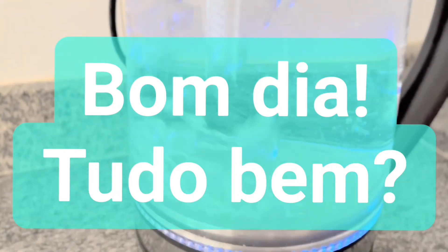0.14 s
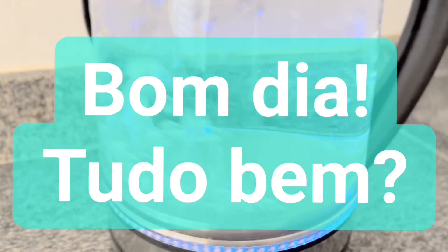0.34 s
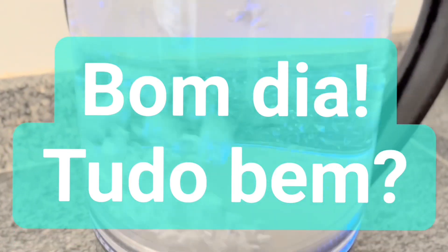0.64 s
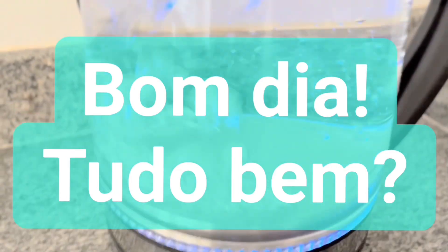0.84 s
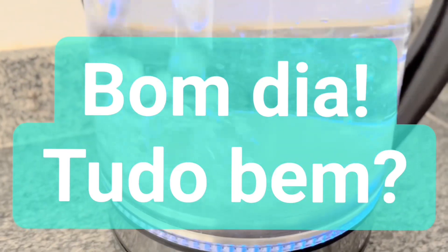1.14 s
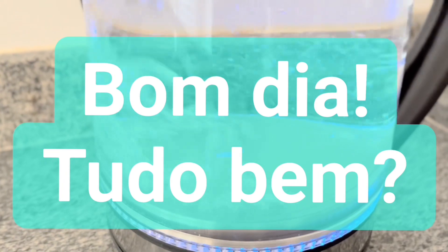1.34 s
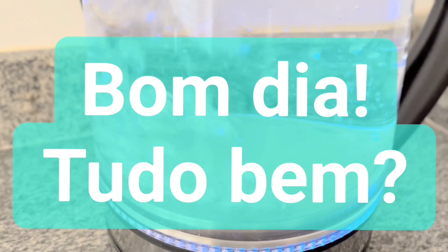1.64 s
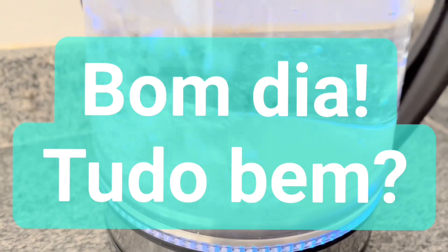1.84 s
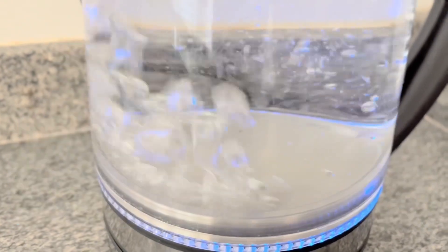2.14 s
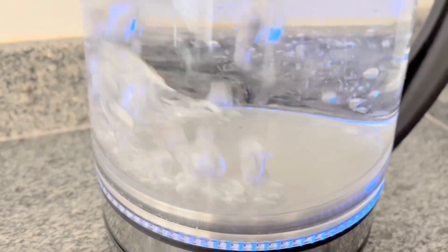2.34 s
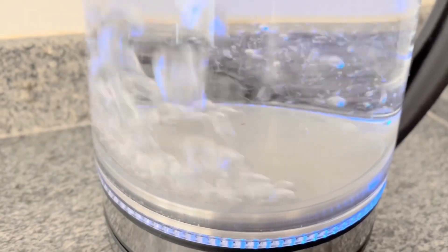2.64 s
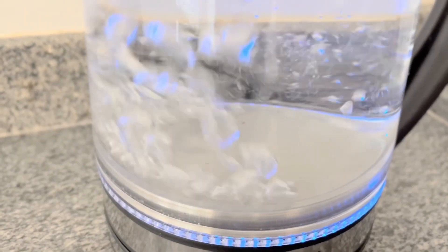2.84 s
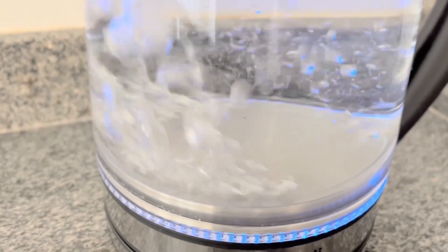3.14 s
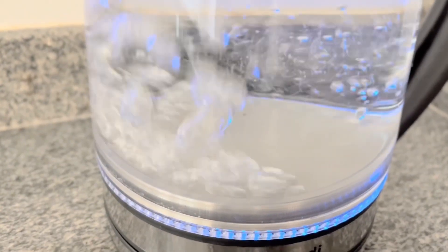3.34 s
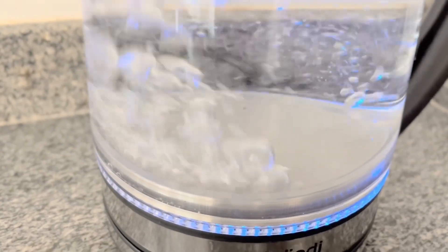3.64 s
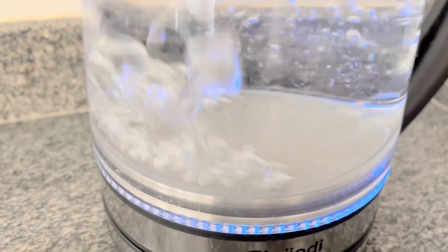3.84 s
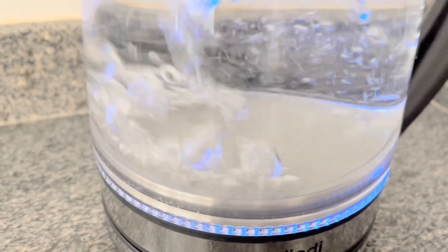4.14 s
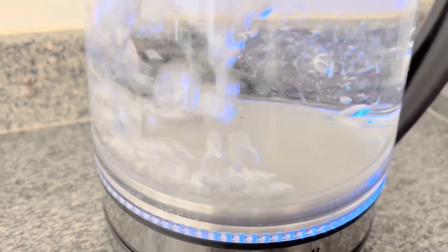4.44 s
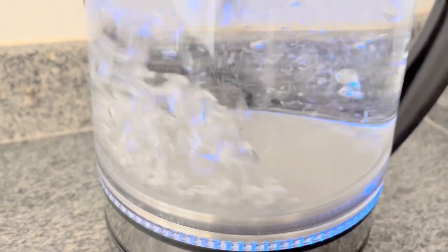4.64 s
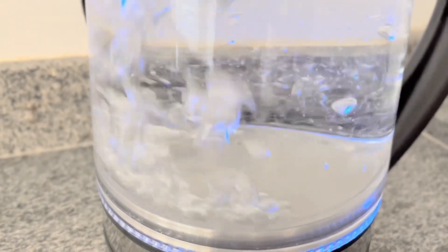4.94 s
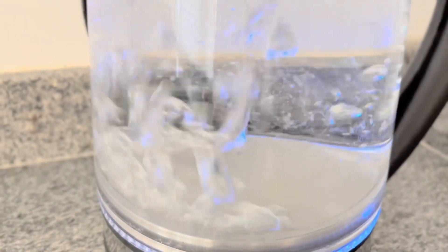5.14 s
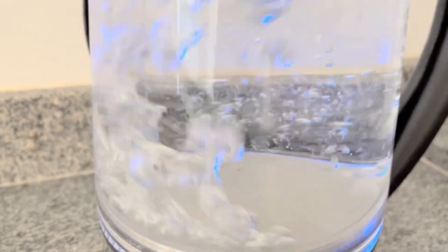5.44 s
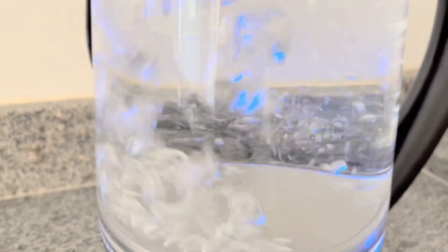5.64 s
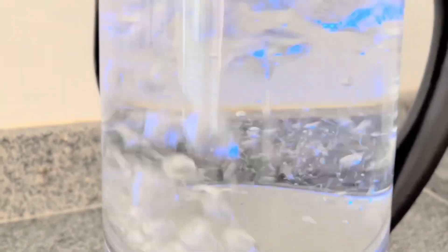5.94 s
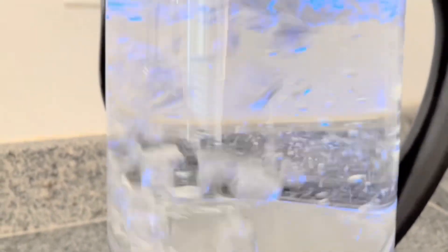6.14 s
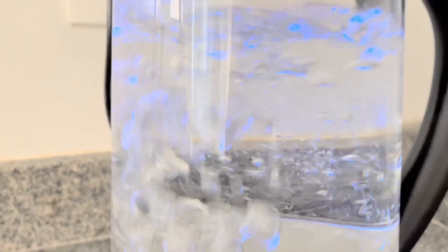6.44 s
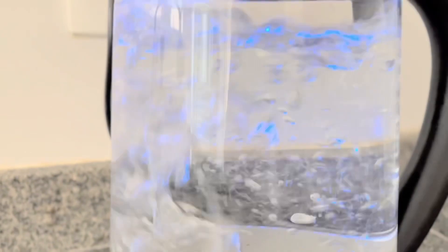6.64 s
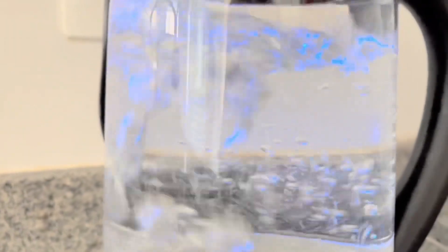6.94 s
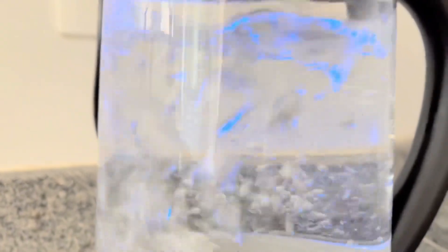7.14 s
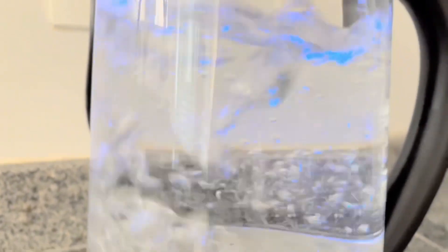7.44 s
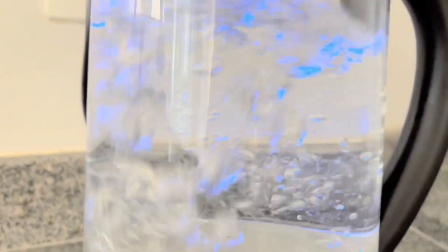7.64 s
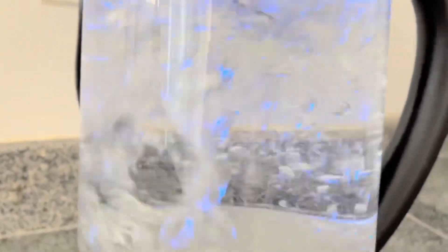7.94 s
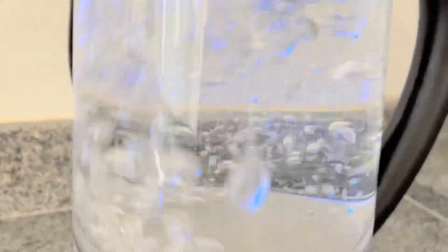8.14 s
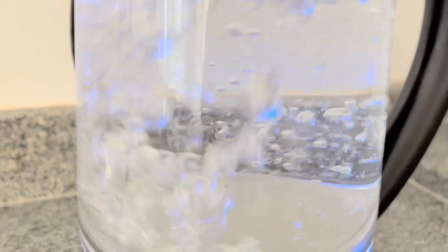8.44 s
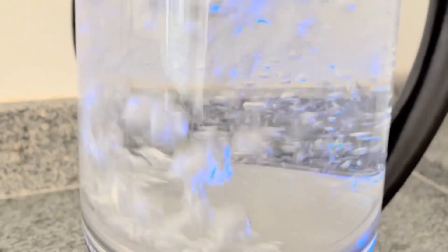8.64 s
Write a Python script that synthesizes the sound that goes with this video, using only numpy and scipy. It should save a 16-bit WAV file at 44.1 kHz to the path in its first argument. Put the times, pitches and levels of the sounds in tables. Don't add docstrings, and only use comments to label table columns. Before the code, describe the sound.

Continuous rolling boil in a glass jug, heard very near and fairly dry in a kitchen. The deep water rumble surges and dips several times a second under a dense gurgling churn. Rounded bubbles gulp and pop, little ones ping faintly on glass, and sharp spatter increases with time. A very faint electric buzz hides in the base.

```python
import sys
import numpy as np
from scipy import signal
from scipy.fft import rfft, irfft, next_fast_len
from scipy.io import wavfile
from scipy.ndimage import uniform_filter1d

SR = 44100
rng = np.random.default_rng(int(sys.argv[2]) if len(sys.argv) > 2 else 0)


def inscribe(sig):
    pcm = np.round(np.clip(np.atleast_2d(sig).T, -1, 1) * 32767)
    wavfile.write(sys.argv[1], SR, pcm.astype(np.int16))


def ratio_of_db(decibels):
    return 10 ** (np.asarray(decibels, float) / 20)


N = 387631


def rms_one(x):
    return x / np.sqrt(np.mean(x ** 2) + 1e-20)


def in_time(rows):
    s, value = np.transpose(rows)
    return np.interp(np.arange(N) / SR, s, value)


def at_hz(rows, hz, column=1):
    rows = np.array(rows)
    return np.interp(np.log(hz), np.log(rows[:, 0]), rows[:, column])


def band_pass(order, low_hz, high_hz, x):
    return signal.sosfilt(signal.butter(order, [low_hz, high_hz], "band", fs=SR, output="sos"), x)


def pan(side_db):
    return ratio_of_db(np.array([[side_db], [-side_db]]))


def add(out, s, sound):
    i = round(s * SR)
    out[:, i:i + sound.shape[1]] += sound[:, :N - i]


def drift(rate):
    r = np.exp(-40 * np.pi * rate / SR)
    slow = signal.lfilter([1], [1, -2 * r, r * r], rng.standard_normal(N // 20 + 4002))[4000:]
    return np.interp(np.arange(N) / 20, np.arange(len(slow)), rms_one(slow))


def puffs(chance, spread_db, decay_s):
    size = (rng.random(N) < chance) * ratio_of_db(2 * spread_db * np.minimum(rng.exponential(1, N), 4.0))
    return signal.lfilter([1], [1, -np.exp(-1 / (decay_s * SR))], size + 1e-18)


def collapses(crackle):
    spread_db, clump_db, patchy_db, gritty_hz = 3.5, 1.5, 1.5, 1520
    swell = drift(12.0) + 0.47 * drift(27.0)
    chance = 140.0 * ratio_of_db(clump_db * swell) / SR
    splash = puffs(0.24 * chance, spread_db, decay_s=0.0079)
    streams = []
    for turn in range(3):
        power = 0.55 * splash + puffs(chance, spread_db, decay_s=0.003)
        roar = rng.standard_normal((2, N))
        clicks = rms_one(np.sqrt(power) * rng.standard_normal((2, N)))
        streams.append((roar, clicks))
    edges = 20 * 2 ** np.arange(0, 10.1, .5)
    out = np.zeros((2, N))
    for k, (low, high) in enumerate(zip(edges, edges[1:])):
        roar, clicks = streams[k % 3]
        grit = 1 / (1 + (gritty_hz / low) ** 5.5)
        share = np.clip(crackle, 0, 1) * grit
        mixed = np.sqrt(1 - share) * roar + np.sqrt(share) * clicks
        patches_db = patchy_db * np.sqrt(grit) * (0.067 * swell + drift(21.5))
        out += band_pass(2, low, high, mixed) * ratio_of_db(patches_db)
    return out


def bubbling(low_hz, high_hz, per_s, cycles, spread_db):
    size = (rng.random(N) < per_s / SR) * ratio_of_db(spread_db * np.minimum(rng.exponential(1, N), 4.0))
    pitches, dealt = np.geomspace(low_hz, high_hz, 16), rng.integers(0, 16, N)
    out = np.zeros(N)
    for k, hz in enumerate(pitches):
        r, w = np.exp(-hz / cycles / SR), 2 * np.pi * hz / SR
        blows = size * (dealt == k) + 1e-18
        ringing = signal.lfilter([0, 1], [1, -2 * r * np.cos(w), r * r], blows)
        out += np.sqrt(hz) * rms_one(ringing)
    return rms_one(out)


# start_s, level_db
CHURN = [(0, -2), (0.6, -1.6), (1, 0.5), (1.5, -2), (2.2, -0.2), (3, -0.5), (3.5, -0.5), (4, 1.3),
         (4.6, -0.3), (5.1, 0), (5.6, -1), (6.3, -1), (6.9, 0.1), (7.6, -2), (8.13, 1.5), (8.26, -3.5),
         (8.4, 0.5), (8.7, 1)]
# start_s, peak_db, pitch_hz
GULPS = [(0.137, -25, 546), (0.574, -26, 567), (0.66, -24, 560), (0.71, -28, 530), (0.944, -23, 715),
         (1.501, -25, 656), (1.593, -25, 700), (1.634, -24, 530), (1.707, -32, 694), (1.884, -32, 640),
         (2.006, -23, 660), (2.058, -34, 534), (2.226, -24, 590), (2.252, -28, 543), (2.411, -38, 690),
         (2.556, -34, 540), (2.84, -23, 675), (2.92, -41, 589), (3.228, -30, 525), (3.291, -21, 546),
         (3.341, -28.5, 684), (3.477, -28, 540), (3.573, -29, 560), (3.833, -25, 670), (3.966, -26, 640),
         (4.006, -28, 575), (4.151, -24, 486), (4.175, -19.5, 541), (4.287, -30, 646), (4.566, -21.5, 563),
         (4.602, -24, 666), (4.738, -25, 553), (4.888, -21, 643), (4.945, -40, 670), (5.296, -20.5, 590),
         (5.342, -32, 697), (5.417, -26, 544), (5.709, -27, 615), (5.809, -26, 680), (5.865, -25, 660),
         (5.902, -25, 670), (6.35, -26.5, 550), (6.407, -31, 546), (6.492, -32, 560), (6.537, -26, 566),
         (6.627, -31, 640), (6.885, -25, 570), (7.486, -30, 700), (7.514, -23, 574), (7.619, -25, 544),
         (7.645, -28, 525), (7.716, -26, 677), (7.739, -25, 680), (8.086, -26, 547), (8.124, -20, 666),
         (8.33, -24, 595), (8.421, -27, 556), (8.511, -25.5, 540), (8.672, -21.5, 590), (8.763, -21.5, 606)]


def lull_db():
    t, out = np.arange(N) / SR, np.zeros(N)
    for s, peak_db, hz in GULPS:
        near = slice(max(round((s - .03) * SR), 0), round((s + .04) * SR))
        out[near] -= 4.2 * np.exp(-((t[near] - s + .003) / 0.0068) ** 2)
        out[near] -= 1.8 * np.exp(-((t[near] - s - .01) / 0.0029) ** 2)
    return out + in_time(CHURN) + 0.87


def bumps_db(modes, hz):
    return sum(top_db / (1 + (2 * (hz - f) / width) ** 2) for f, width, top_db in modes)


def causal(gain_db, size):
    cepstrum = irfft(gain_db * np.log(10) / 20, size)
    cepstrum[1:(size + 1) // 2] *= 2
    cepstrum[size // 2 + 1:] = 0
    return np.exp(rfft(cepstrum))


# freq_hz, density_db (dB per Hz)
JUG = [(28, -34), (50, -37), (66, -6), (130, -4.5), (260, -6.5), (450, -7.5), (750, -9), (1000, -13),
       (1600, -22), (2500, -30), (3500, -32.5), (6500, -40.5), (12300, -48), (13800, -57), (15000, -77)]
# freq_hz, width_hz, rise_db above the broad colour
WALL = [(80, 21, -2), (104, 21.4, 8), (212, 22, 6), (250.2, 21, 7.5), (335.4, 19.2, 8), (362, 22, 4),
        (557, 59.6, 8.5), (685, 87, 8), (1035, 13, 2.5), (1108, 18, 5), (1136, 19, 4.5), (1256, 21, 4),
        (1501, 99, 9.5), (1563, 21, 8), (1700, 72, -6), (1798, 100, 5), (1940, 29, -5), (1999, 32, 6.5),
        (2360, 200, 4), (2740, 180, -1), (2944, 54, 8.5), (3010, 40, 3), (3210, 41, 6), (3590, 320, -3.5),
        (4090, 56, 7), (4260, 240, 5.5), (5200, 110, 5), (5800, 780, 2), (7460, 590, 5),
        (10100, 1200, -1.5)]
# freq_hz, density_db (dB per Hz)
ACROSS = [(30, -26), (166, 0.5), (426, -12.5), (536, -1.5), (710, -5), (849, -11), (1070, -7), (2180, -17),
          (3280, -25.5), (5330, -25.5), (9300, -35.5), (11000, -41), (13400, -34.5), (15700, -36)]
# freq_hz, width_hz, rise_db
SWAY = [(2820, 230, 12.5), (2780, 260, 6), (310, 83, 10.5), (700, 200, 4.5), (1120, 60, 8), (1180, 65, -5),
        (4200, 460, 3), (9900, 700, 3)]
# freq_hz, in_step (-1..1), quarter_cycle_off (-1..1)
LEAN = [(60, .3, 0), (160, 0.01, -0.61), (300, 0.54, 0.41), (590, 0, .5), (1200, 0.4, 0.24),
        (2760, 0.014, 0), (4200, 0.35, .5), (6540, 0.64, .3), (9000, 0.33, 0.14), (14000, 0, 0)]


def jug(stream):
    t, size = np.arange(N) / SR, next_fast_len(N)
    hz = np.maximum(np.arange(size // 2 + 1) * SR / size, 1)
    near, diffuse = rfft(stream, size)
    colour = causal(at_hz(JUG, hz) + bumps_db(WALL, hz), size)
    middle_sound = colour * near
    lean = at_hz(LEAN, hz) + 1j * at_hz(LEAN, hz, column=2)
    unrelated = np.sqrt(np.clip(1 - abs(lean) ** 2, 0, 1)) * diffuse
    apart = lean * near * colour / abs(colour) + unrelated
    apart = apart * ratio_of_db(-11.5 + at_hz(ACROSS, hz) + bumps_db(SWAY, hz))
    both = np.array([middle_sound + apart, middle_sound - apart])

    low = 1 / (1 + (hz / 420) ** 4) / (1 + (170 / hz) ** 4)
    high = 1 / (1 + (3000 / hz) ** 3)
    gurgling = 1 / (1 + (hz / 1150) ** 6) / (1 + (440 / hz) ** 6) * (1 - low)
    parts = (low, gurgling, 1 - low - high, high)
    hum, gurgle, middle, top = (irfft(both * part, size)[:, :N] for part in parts)
    hum_db = 4.5 - 0.76 * t
    brighten_db = 1.38 + 0.22 * t
    body_db = -40 + 0.0124 * t
    mix = ratio_of_db(hum_db) * hum + (ratio_of_db(lull_db()) - 1) * gurgle + middle + ratio_of_db(brighten_db) * top
    return ratio_of_db(body_db) * mix / np.std(middle.mean(axis=0))


# start_s (centre), rise_db, half_length_s
SURGES = [(0.0, 11, 0.022), (0.42, 10, 0.011), (0.538, 9.5, 0.012), (0.628, 5, 0.018), (0.773, 10, 0.013),
          (1.01, 6, 0.027), (1.393, 7.5, 0.023), (1.514, 7, 0.025), (1.619, 5, 0.02), (1.791, 8, 0.018),
          (1.951, 3.5, 0.085), (2.335, 10, 0.016), (2.456, 5.0, 0.065), (2.627, 6, 0.02),
          (2.743, 5.5, 0.027), (3.011, 8.5, 0.027), (3.237, 10.5, 0.044), (3.312, 10, 0.012),
          (3.454, 6.5, 0.018), (3.722, 5.5, 0.075), (3.839, 4.8, 0.016), (4.32, 7.5, 0.036),
          (4.825, 8.5, 0.016), (5.095, 7, 0.058), (5.444, 10.5, 0.019), (5.845, 7.5, 0.012),
          (6.042, 3, 0.09), (6.212, 6.5, 0.016), (6.362, 9, 0.015), (6.712, 12, 0.0054), (6.788, 7, 0.014),
          (7.005, 12, 0.017), (7.243, 7.5, 0.014), (7.372, 4, 0.018), (7.481, 3, 0.075), (7.685, 2, 0.027),
          (7.766, 10, 0.012), (7.853, 5, 0.039), (8.037, 6, 0.038), (8.161, 8, 0.013), (8.308, 8, 0.016),
          (8.561, 6.5, 0.022)]
# start_s (centre), drop_db, half_length_s
LULLS = [(0.19, 3, 0.079), (0.375, 8.3, 0.016), (0.467, 11, 0.014), (0.575, 8, 0.012), (0.675, 9, 0.0092),
         (0.82, 10.6, 0.018), (1.15, 12, 0.027), (1.24, 6, 0.0081), (1.457, 8, 0.014), (1.737, 16, 0.025),
         (1.824, 13, 0.014), (1.875, 3, 0.008), (2.257, 5.7, 0.012), (2.372, 8, 0.011), (2.588, 10, 0.016),
         (2.697, 12, 0.012), (2.794, 9, 0.02), (3.28, 4, 0.012), (3.417, 9, 0.012), (3.502, 5, 0.035),
         (3.616, 6, 0.042), (3.794, 9, 0.011), (4.0, 11, 0.01), (4.057, 10, 0.011), (4.132, 5, 0.011),
         (4.225, 12.0, 0.025), (4.384, 10, 0.011), (4.6, 11, 0.012), (4.67, 9, 0.011), (4.793, 8, 0.011),
         (4.866, 19, 0.015), (4.953, 6.4, 0.027), (5.037, 13, 0.0073), (5.145, 8, 0.012),
         (5.176, 4.5, 0.047), (5.26, 7.3, 0.01), (5.32, 13, 0.0089), (5.693, 11, 0.018), (5.792, 14, 0.024),
         (6.155, 9, 0.025), (6.3, 10, 0.018), (6.464, 7, 0.041), (6.636, 15, 0.016), (6.743, 12, 0.0086),
         (6.894, 5, 0.053), (7.128, 2, 0.0087), (7.407, 9, 0.0099), (7.617, 7, 0.021), (7.738, 11, 0.011),
         (7.792, 16, 0.01), (7.926, 8, 0.024), (8.252, 9, 0.012), (8.348, 13, 0.012), (8.501, 5, 0.021),
         (8.61, 7, 0.034), (8.688, 5, 0.015)]


def heave_db():
    t = np.arange(0, N, 64) / SR
    lift, cut = (sum(db * np.exp(-((t - s) / half) ** 2) for s, db, half in rows) for rows in (SURGES, LULLS))
    return np.interp(np.arange(N) / SR, t, -31.5 - 0.15 * t + 0.79 * lift - 1.17 * cut)


# freq_hz, width_hz, level_db
COLUMN = [
    (152.3, 8.2, -5.5),
    (164.1, 21.7, -3),
    (173.6, 6.9, -5),
]


def rumble():
    hz = np.arange(N // 2 + 1) * SR / N
    gain = sum(ratio_of_db(top_db) / (1 + (2 * (hz - f) / width) ** 2) for f, width, top_db in COLUMN)
    tone = irfft(gain * rfft(rng.standard_normal(N)), N)
    power = uniform_filter1d(uniform_filter1d(tone ** 2, size=1000), size=1000)
    steady = rms_one(tone / np.sqrt(power + 0.046 * tone.var()))
    limits = np.sqrt((1 + (hz / 187) ** 30) * (1 + (138 / (hz + 1)) ** 14))
    return irfft(rfft(ratio_of_db(heave_db()) * steady) / limits, N) * pan(.7)


def bubble(hz, cycles, rise):
    t = np.arange(int(.04 * SR)) / SR
    sine = np.sin(2 * np.pi * hz * t * (1 + rise * hz * t / cycles))
    return sine * np.exp(-hz * t / cycles) * (1 - np.exp(-3 * hz * t))


def bubbles(rows, trim_db, side_db, cycles, rise):
    out = np.zeros((2, N))
    for s, peak_db, hz in rows:
        add(out, s, ratio_of_db(peak_db + trim_db) * pan(side_db) * bubble(hz, cycles, rise))
    return out


def gulps():
    return bubbles(GULPS, trim_db=-4.4, side_db=0, cycles=4.6, rise=0.0357)


# start_s, peak_db, pitch_hz
POPS = [(0.907, -33, 1140), (1.44, -21, 1010), (2.446, -21, 1070), (2.546, -23, 940), (2.582, -25, 910),
        (2.988, -21, 1040), (3.0357, -24, 1120), (3.1, -26, 1060), (3.324, -25, 1120), (3.615, -23, 910),
        (3.674, -25, 1120), (3.8297, -21, 1150), (5.038, -20, 1000), (5.343, -22, 920), (5.5069, -25, 1140),
        (5.556, -33, 1080), (5.7144, -21, 1040), (6.164, -23, 1120), (6.305, -23, 1230), (6.436, -23, 1450),
        (6.606, -24, 1040), (7.488, -25, 1160), (7.5932, -30, 950), (7.615, -26, 880), (7.7248, -31, 1520),
        (8.0075, -21, 840), (8.241, -22, 1090), (8.67, -25, 1120)]


def pops():
    return bubbles(POPS, trim_db=-10.0, side_db=1.5, cycles=4.5, rise=0.015)


# start_s, peak_db, pitch_hz
PINGS = [(0.2164, -47, 3210), (0.5048, -53, 2990), (0.9203, -52, 2930), (1.3104, -53, 2980),
         (1.4431, -48, 2970), (1.516, -44, 2920), (1.5743, -53, 2900), (1.7509, -46, 2920),
         (1.8093, -52, 3010), (2.8649, -53, 2970), (2.8943, -52, 2910), (3.03, -52, 3020),
         (3.9389, -48, 2910), (4.0587, -51, 2970), (4.1654, -51, 2960), (4.1749, -45, 3020),
         (4.2453, -46, 3030), (4.3091, -52, 3000), (4.574, -46, 2920), (4.8199, -46, 3040),
         (5.2475, -51, 3180), (6.1205, -49, 3250), (6.4901, -50, 3010), (6.6104, -46, 3380),
         (7.2584, -46, 3230), (7.4729, -48, 3100), (7.6445, -52, 3240), (8.1668, -46, 3260),
         (8.4911, -49, 3210), (8.521, -41, 3200)]


def pings():
    return bubbles(PINGS, trim_db=-2.0, side_db=1.5, cycles=11.0, rise=0.012)


# start_s, peak_db, pitch_hz
BURSTS = [(0.0497, -46, 4210), (0.2156, -47, 4300), (0.7726, -49, 3960), (1.0355, -49, 4130),
          (1.4097, -52, 4090), (1.661, -47, 4080), (1.7225, -56, 4090), (1.7574, -48, 4070),
          (1.7749, -48, 4100), (2.144, -50, 4360), (3.031, -42, 4500), (3.0984, -51, 4080),
          (3.4196, -48, 4270), (3.689, -49, 4170), (3.7958, -51, 4470), (3.8975, -48, 4060),
          (3.934, -49, 4430), (4.127, -50, 4080), (4.178, -45, 4200), (4.3784, -47, 4090),
          (4.4702, -46, 4200), (4.5985, -48, 4140), (4.6114, -43, 4090), (4.821, -45, 4230),
          (4.9154, -44, 4070), (4.9811, -43, 4060), (5.018, -49, 4090), (5.1093, -50, 4150),
          (5.183, -44.5, 4290), (5.68, -48, 4100), (5.8057, -46, 4220), (5.9708, -50, 4370),
          (5.9988, -48, 4090), (6.116, -47, 4370), (6.2761, -50, 4100), (6.4901, -51, 4600),
          (6.503, -43.5, 4360), (6.6089, -43, 4320), (7.049, -42.5, 4090), (7.1656, -49, 4220),
          (7.185, -44, 4330), (7.3372, -44, 4030), (7.428, -46, 4180), (7.4966, -48, 4040),
          (7.5148, -49, 4080), (7.7907, -52, 4300), (7.9154, -49, 3940), (7.9818, -50, 4040),
          (8.1664, -40.5, 4260), (8.4961, -46, 4090), (8.523, -42, 4080), (8.597, -49, 4300),
          (8.6647, -44, 4080)]


def bursts():
    out, t = np.zeros((2, N)), np.arange(int(.04 * SR)) / SR
    for s, peak_db, hz in BURSTS:
        tick = band_pass(3, 2600, 9000, rng.standard_normal(len(t)) * np.exp(-t / .003))
        sound = bubble(hz, cycles=6.0, rise=0.004) + ratio_of_db(-3.0) * tick
        add(out, s, ratio_of_db(peak_db + 2.4) * pan(3) * sound)
    return out


# start_s, peak_db, mist_db (finest mist against the peak)
SPITS = [(1.0794, -58, -36), (3.029, -41, -61), (3.2715, -53, -58), (3.8028, -50, -37), (3.8711, -41, -60),
         (4.125, -55, -33), (4.3355, -52, -19), (4.377, -46, -59), (4.3994, -53, -58), (4.8863, -54, -34),
         (4.9018, -42, -29), (4.9147, -37, -38), (5.1098, -45, -60), (5.215, -47, -51), (5.8037, -48, -58),
         (5.917, -51, -58), (6.0182, -53, -57), (6.1155, -56, -60), (6.2662, -53, -56), (6.391, -60, -58),
         (6.503, -54, -58), (6.5809, -53, -38), (6.6009, -49, -31), (6.9446, -42, -29), (6.9775, -45, -60),
         (7.052, -53, -58), (7.652, -57, -23), (7.8406, -41, -57), (7.9069, -51, -59), (8.0765, -40, -60),
         (8.1658, -44, -56), (8.395, -36, -50), (8.4836, -56, -40), (8.521, -31, -36), (8.6428, -49, -60),
         (8.71, -58, -40)]


def spits():
    out, t = np.zeros((2, N)), np.arange(int(.04 * SR)) / SR
    airy = signal.butter(6, 15100, "high", fs=SR, output="sos")
    for s, peak_db, mist_db in SPITS:
        noise = rng.standard_normal((3, len(t))) * np.exp(-t / 0.006)
        puff = 0.47 * noise[0] + 1.25 * noise[1:]
        mist = signal.sosfilt(airy, puff + 1.5 * noise[0])
        spray = band_pass(4, 4800, 12300, puff) + ratio_of_db(mist_db + 21.0) * mist
        add(out, s, ratio_of_db(peak_db - 13.0) * pan(.5) * spray)
    return out


# start_s, peak_db
SPATTER = [(3.2717, -45), (3.4293, -53), (3.7356, -51), (4.0215, -53), (4.3353, -45), (4.3767, -53),
           (4.5767, -51), (4.8865, -49), (4.9149, -57), (4.9808, -56), (5.0372, -52), (5.11, -47),
           (5.2148, -50), (5.2482, -45), (5.2911, -51), (5.4008, -54), (5.5495, -54), (5.5819, -52),
           (5.7416, -55), (5.8056, -50), (6.0184, -47), (6.1152, -52), (6.224, -48), (6.2489, -52),
           (6.2664, -44), (6.3128, -53), (6.3901, -48), (6.4834, -54), (6.502, -51), (6.5253, -50),
           (6.6021, -44), (6.9199, -59), (6.9443, -47), (6.9757, -45), (7.0436, -57), (7.1089, -50),
           (7.2576, -42), (7.321, -48), (7.6956, -45), (7.9196, -46), (7.9805, -48), (8.0767, -47),
           (8.0882, -41), (8.165, -49), (8.5222, -43), (8.5876, -52), (8.643, -45)]


def spatter():
    out, t = np.zeros((2, N)), np.arange(int(.02 * SR)) / SR
    for s, peak_db in SPATTER:
        noise = rng.standard_normal((3, len(t)))
        fleck = (noise[0] + 0.97 * noise[1:]) * np.exp(-t / 0.002)
        add(out, s, ratio_of_db(peak_db - 4.5) * band_pass(2, 3300, 9500, fleck))
    return out


def droplets():
    per_s = 170.0 * (np.arange(N) / N) ** 1.1
    power = puffs(per_s / SR, spread_db=-2.0, decay_s=0.0012)
    noise = rng.standard_normal((3, N))
    ticks = rms_one(np.sqrt(power) * (noise[0] + 0.59 * noise[1:]))
    return ratio_of_db(-68.5) * band_pass(2, 2500, 9000, ticks)


# multiple (of the pulse rate), level_db
BUZZ = [(42, -6), (43, -12), (48, -14), (50, -7), (51, -12), (52, -5), (53, 0), (54, -10), (55, -10),
        (59, -15)]
# start_s, level_db
BUZZ_LEVEL = [
    (0, -74.5),
    (3, -70.5),
    (5.5, -71),
    (6.1, -75.5),
    (8.79, -73.5),
]


def buzz():
    pulse_hz = 103.93
    cycle = 2 * np.pi * pulse_hz * np.arange(N) / SR
    lines = sum(ratio_of_db(db) * np.sin(k * cycle + rng.uniform(0, 2 * np.pi)) for k, db in BUZZ)
    level_db = in_time(BUZZ_LEVEL) + 1.5 * drift(3.0)
    return ratio_of_db(level_db) * np.sqrt(2) * lines * pan(3.5)


# start_s, crackle (share 0-1)
BOIL = [
    (0, 0),
    (1, 0.35),
    (2, 0.22),
    (3, 0.15),
    (4, 0.47),
    (5, 0.23),
    (6, 0.54),
    (7, 0.27),
    (8, 0.36),
    (8.79, 0.24),
]


def scene():
    crackle = in_time(BOIL)
    stream = collapses(crackle)
    stream[0] += ratio_of_db(-12.0) * bubbling(408.5, 2570, per_s=800.0, cycles=2.45, spread_db=3.0)
    fizz = bubbling(2227, 10000, per_s=500.0, cycles=8.1, spread_db=6.0)
    stream += ratio_of_db(-9.0) * np.sqrt(np.clip(crackle, 0, 1)) * fizz * np.array([[1], [.6]])
    surface = gulps() + pops() + pings() + bursts() + spits() + spatter() + droplets()
    return jug(stream) + rumble() + surface + buzz()


def low_pass(x):
    return signal.sosfilt(signal.butter(12, 15760, fs=SR, output="sos"), x)


def record(dry):
    fade_in, fade_out = np.arange(N) / 60, np.arange(N, 0, -1) / 130
    return low_pass(dry * np.minimum(np.minimum(fade_in, fade_out), 1))


dry = scene()
out = record(dry)
inscribe(out)
```